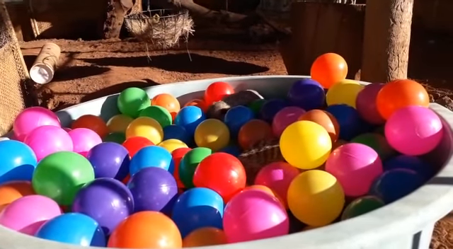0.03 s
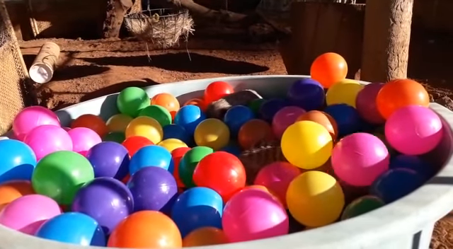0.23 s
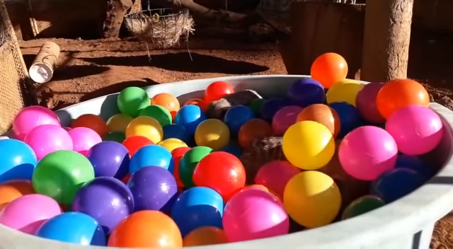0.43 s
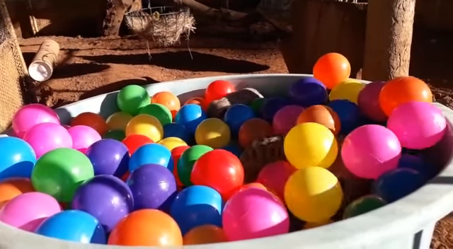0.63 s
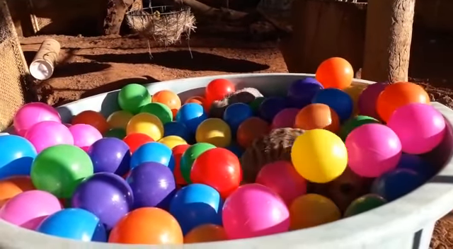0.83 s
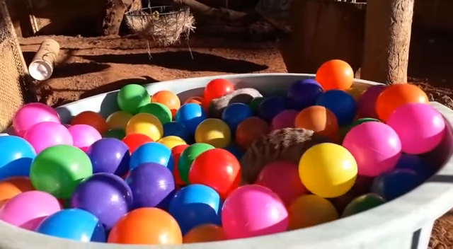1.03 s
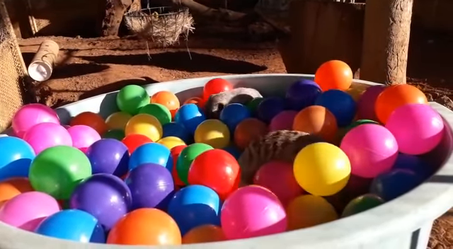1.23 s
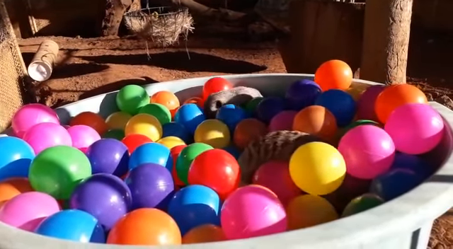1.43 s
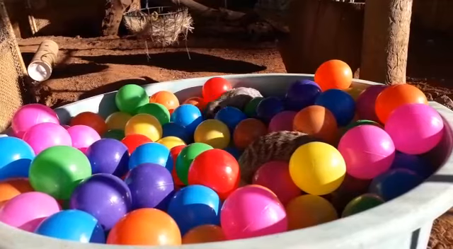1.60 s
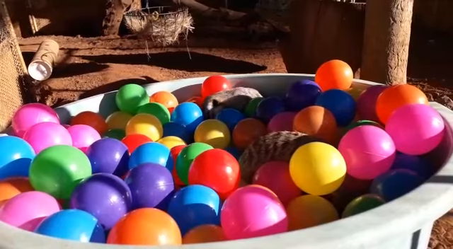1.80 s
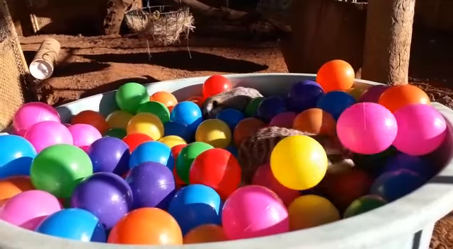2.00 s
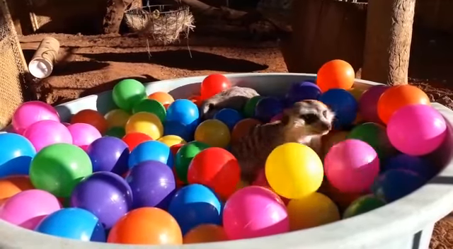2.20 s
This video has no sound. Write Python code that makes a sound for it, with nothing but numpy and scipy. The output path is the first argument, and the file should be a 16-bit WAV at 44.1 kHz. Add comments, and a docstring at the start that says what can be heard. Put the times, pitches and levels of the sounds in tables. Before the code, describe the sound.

Close by, meerkats scuff through hollow plastic balls in a tub, making a brief clatter, then a lull and a last knock. Behind them are rolling dove coos, thin bird whistles and a low outdoor rumble.

```python
"""Meerkats dig in a tub of hollow plastic balls, over a low outdoor rumble and a faint stereo hiss.
A nearby dove opens with a rolling coo while another calls farther off. Claws scuff the plastic and
the balls build to a burst of rubbing, ticking and hollow knocks, with two short coos among them.
In the lull a small bird whistles, the far dove answers and the near one rolls again. After one more
short coo the balls stir back up, squeak once and end on a last knock."""
import sys
import numpy as np
from scipy import signal
from scipy.fft import rfft, irfft
from scipy.io import wavfile

SR = 44100
rng = np.random.default_rng(int(sys.argv[2]) if len(sys.argv) > 2 else 0)


def inscribe(sig):
    """Save sig as 16-bit PCM at rate SR to the path in sys.argv[1].

    A 1-D sig is mono; a 2-D sig holds one channel per row.
    Samples are clipped to [-1, 1] before scaling.
    """
    pcm = np.round(np.clip(np.atleast_2d(sig).T, -1, 1) * 32767)
    wavfile.write(sys.argv[1], SR, pcm.astype(np.int16))


N = 103635

# EQ of the low outdoor rumble (frequency [Hz], gain [dB])
RUMBLE_EQ = [(20, -29), (40, -23.5), (65, -5), (98, 4), (130, -2), (190, -3), (300, -20), (600, -29.5),
             (3000, -32.5), (6000, -35), (7600, -32.5), (9000, -37.5), (15500, -35.5)]
# EQ of a separate faint stereo hiss (frequency [Hz], gain [dB])
HISS_EQ = [(300, -2), (1200, -18.5), (7000, -1)]

# songbird whistles, one curve each, and its closing warble (time [s], pitch [Hz], relative level [dB])
WHISTLES = [
    [(1.285, 2570, -79), (1.33, 2540, -67), (1.387, 2787, -62)],
    [(1.395, 2840, -75), (1.432, 2960, -58.5), (1.47, 2598, -56), (1.495, 2597, -55.5),
     (1.535, 2960, -65.5)],
    [(1.42, 3250, -71), (1.5, 3640, -78.5)],
    [(1.56, 2194, -73), (1.595, 2275, -69.5), (1.624, 2420, -62)],
    [(1.9, 3040, -80), (1.94, 3270, -68), (1.975, 3160, -76)],
    [(2.02, 2980, -73), (2.055, 3230, -60)],
]
WARBLE = [(2.064, 3060, -60), (2.11, 2880, -56.5), (2.18, 2790, -63)]
# far dove's rolling coos, one curve each (time [s], pitch [Hz], relative level [dB])
FAR_ROLLS = [
    [(0, 896, -53), (.08, 902, -65.5), (.16, 853, -61.5)],
    [(1.19, 949.6, -55.5), (1.26, 950, -60.5), (1.5, 882, -59.5)],
    [(1.97, 873, -58.5), (2.1, 894, -83), (2.16, 951, -55), (2.25, 912, -81)],
]

# near dove's plain coos, one curve each (time [s], pitch [Hz], level [dB])
COOS = [
    [(.706, 760, -62), (.718, 828, -45.5), (.735, 937, -53.5), (.752, 1005, -55), (.775, 870, -48.5),
     (.79, 790, -76)],
    [(1.1, 810, -60), (1.108, 839, -47.5), (1.126, 1017, -51.5), (1.16, 1003, -49.5), (1.185, 950, -60.5),
     (1.203, 752, -51.5), (1.215, 794, -50)],
    [(2.024, 744, -79), (2.034, 806, -42), (2.052, 902, -57), (2.068, 998, -52), (2.08, 808, -47),
     (2.092, 796, -90)],
]
# cues for its rolling coos (start [s], first pitch crest [s], end [s], level [dB], wall echo gain [dB])
ROLL_CUES = [(.181, .19, .632, -50, -11), (1.499, 1.531, 1.97, -51, -7.5)]
# contour of a roll (time from first crest [s], pitch [Hz], gain [dB], pulse depth [0-1])
ROLL_CONTOUR = [(-.02, 860, 0, .1), (.012, 990, -2.5, .1), (.07, 920, 0, .1), (.15, 875, 2, .15),
                (.24, 865, 1.5, .85), (.33, 855, 1, .9), (.43, 825, 3, .85), (.455, 800, -10, .6)]

# EQ of ball thuds, shell clacks and fine ticks (frequency [Hz], gain [dB])
THUD_EQ = [(40, -52.5), (110, -6.5), (200, 5.5), (400, -4.5), (620, -8.5), (900, -5.5), (1500, -24),
           (4000, -58)]
CLACK_EQ = [(250, 3), (700, -1.5), (1180, -2.5), (1520, -3.5), (1900, 4), (2550, -0.5), (3200, -13.5),
            (4200, -13.5), (9000, -55)]
TICK_EQ = [(800, -7), (3000, 8), (4200, -5), (4800, 0), (5600, 0), (7500, 4.5), (8900, -13.5),
           (12000, -8.5), (15500, -13)]
# resonances of a hollow ball (frequency [Hz], relative level [dB], t60 [s])
BALL_MODES = [(243, -7, .08), (442, -3, .05), (572, -3, .07), (668, 0, .06), (830, -7, .05),
              (1092, -5, .06), (1190, -4, .07), (1365, -7, .07), (1985, -7, .07), (2330, -7, .07),
              (2538, -6, .07)]
# fader rides for the digging, before trim (time [s], low jostle [dB], shell scrape [dB], fine rub [dB])
DIG_FADERS = [(0, -77, -82, -86), (.26, -74, -79, -88.5), (.38, -84, -68, -79.5), (.5, -62.5, -80, -80),
              (.59, -56, -64.5, -82), (.745, -59.5, -66, -69.5), (.78, -45, -49, -60.5),
              (.815, -52.5, -61.5, -67), (.86, -48, -52.5, -66.5), (.95, -54.5, -59.5, -71),
              (1.06, -55.5, -61, -69.5), (1.13, -57, -68.5, -86.5), (1.23, -59.5, -75.5, -80.5),
              (1.32, -72.5, -81, -101), (2.02, -65, -80, -95), (2.08, -60, -68.5, -79.5),
              (2.22, -67, -62.5, -68), (2.3, -65.5, -71, -75.5), (2.35, -53, -65, -74)]
# claws scuffing over plastic (time [s], length [s], level [dB], low cut [Hz])
SCUFFS = [(.052, .016, -66, 1800), (.527, .007, -59, 5500), (.539, .0055, -52, 5000),
          (.548, .01, -48, 3200), (.56, .016, -56, 2700), (.582, .016, -62, 2000), (2.052, .03, -69, 5000)]
# one ball squeaking against another, as a curve (time [s], pitch [Hz], level [dB])
SQUEAKS = [
    [(2.225, 5650, -77), (2.232, 5430, -52.5), (2.237, 5370, -81)],
]
# balls knocking together (time [s], pock pitch [Hz], pock gain [dB], clack peak [dB], tick peak [dB])
KNOCKS = [(.612, 298, -48.5, -55, -48.5), (0.7597, 1180, -44, -37.5, -68), (0.7726, 231, -35, -41.5, -57),
          (.788, 733, -45, -41.5, -71), (.835, 620, -34, -38, -41.5), (0.8576, 288, -37.5, -43, -45.5),
          (0.9022, 195, -38, -41, -40), (0.9144, 430, -28.5, -34.5, -36.5), (.9162, 725, -31.5, -41, -45),
          (0.9225, 1186, -31, -33.5, -43.5), (0.9253, 620, -33, -30.5, -40), (.968, 327, -50, -43.5, -56),
          (1.008, 283, -37, -42, -67), (1.039, 300, -40.5, -50, -58), (1.0674, 300, -49, -44.5, -50),
          (2.3275, 440, -62, -47.5, -46)]


def amp(db):
    """Decibels to gain."""
    return 10 ** (np.asarray(db) / 20)


def unit(x):
    """Scales to rms 1."""
    return x / np.sqrt(np.mean(x ** 2) + 1e-20)


def along(points, t):
    """Reads each column of a curve at times t."""
    times, *columns = np.transpose(points)
    return [np.interp(t, times, column) for column in columns]


def add(mix, start, sound):
    """Drops a sound into the mix at a start time in seconds."""
    part = mix[max(round(start * SR), 0):][:len(sound)]
    part += sound[:len(part)]


def eq(x, curve):
    """Minimum-phase EQ, so nothing rings ahead of an attack."""
    hz, db = np.transpose(curve)
    bins_hz = abs(np.fft.fftfreq(4096, 1 / SR))
    log_gain = np.log(amp(np.interp(np.log(bins_hz + 1), np.log(hz), db)))
    taps = np.fft.ifft(np.exp(signal.hilbert(log_gain).conj())).real[:2048]
    return signal.fftconvolve(x, taps)[:len(x)]


def low_cut(x, hz):
    """Thins out the lows at 12 dB per octave."""
    return signal.sosfilt(signal.butter(2, hz, "high", fs=SR, output="sos"), x)


def drift(size, rate_hz):
    """Smooth random wander of about rms 1."""
    hz = np.fft.rfftfreq(N, 1 / SR)
    spectrum = rfft(rng.standard_normal(N)) / (1 + (hz / rate_hz) ** 4)
    return unit(irfft(spectrum, N))[:size]


def reverb(x, t60, wet_db):
    """Adds a diffuse, decaying tail."""
    t = np.arange(SR // 2) / SR
    tail = rng.standard_normal(len(t)) * amp(-60 * t / t60) * np.minimum(t / .025, 1)
    return x + amp(wet_db) * signal.fftconvolve(x, tail / np.linalg.norm(tail))[:N]


def rumble_and_hiss():
    """A centred low outdoor rumble, plus a separate faint stereo hiss."""
    rumble = amp(-65) * unit(eq(rng.standard_normal(N), RUMBLE_EQ))
    hiss = amp(-80.5) * unit(eq(rng.standard_normal(N), HISS_EQ))
    return np.array([rumble + hiss, rumble - hiss])


def tone(hz, level, jitter=.013, fade_s=.004):
    """A nearly pure, slightly unsteady note."""
    t = np.arange(len(hz)) / SR
    turns = np.cumsum(hz * (1 + jitter * drift(len(t), rate_hz=100))) / SR
    fade = np.clip(np.minimum(t, t[-1] - t) / fade_s, 0, 1)
    return np.sqrt(2) * level * fade * np.sin(2 * np.pi * turns)


def throb(turns, depth):
    """Tremolo that ducks the note at the bottom of each trill cycle."""
    return 1 - np.clip(depth, 0, 1) * np.sin(np.pi * turns) ** 4


def notes(curves, trill_hz=0, swing_hz=0, pulse_depth=0):
    """Plays pitch curves as tones, plain or trilled."""
    out = np.zeros(N)
    for curve in curves:
        t = np.arange(curve[0][0], curve[-1][0], 1 / SR)
        hz, db = along(curve, t)
        turns = trill_hz * (t - t[0])
        pitch = hz + swing_hz * np.cos(2 * np.pi * turns)
        add(out, t[0], tone(pitch, amp(db) * throb(turns, pulse_depth)))
    return out


def songbird():
    """Thin gliding whistles and a closing warble, blurred by distance."""
    song = notes(WHISTLES) + notes([WARBLE], trill_hz=37, swing_hz=80, pulse_depth=.3)
    return amp(-3) * reverb(song, t60=.27, wet_db=-3)


def far_dove():
    """The answering dove's trilled coos, washed out by distance."""
    rolls = notes(FAR_ROLLS, trill_hz=37.6, swing_hz=57.4, pulse_depth=.34)
    return amp(-1.5) * reverb(rolls, t60=.3, wet_db=-3)


def rolling_coo(t, level_db):
    """A coo that slows, sinks and breaks into pulses; t is zero at its first pitch crest."""
    trill_hz, extra_turns, settle_s = 32.5, .9, .07
    swing_hz, widest_s, spread_s = 117.3, .16, .2
    hz, contour_db, pulse_depth = along(ROLL_CONTOUR, t)
    turns = trill_hz * t + extra_turns * (1 - np.exp(-t / settle_s))
    phase = 2 * np.pi * turns
    cycle = np.cos(phase + .3 * (np.cos(phase) - 1))  # leaps up, slides down
    trill = cycle + .4 * (cycle ** 2 - .5)  # narrow crests, lingering troughs
    swell = np.exp(-((t - widest_s) / spread_s) ** 2 / 2)
    onset = np.clip(.63 + t / .062, 0, 1)
    pitch = hz + swing_hz * swell * onset * trill
    flutter_db = 2.3 * drift(len(t), rate_hz=120)
    level = amp(level_db + contour_db + flutter_db) * throb(turns, pulse_depth)
    return tone(pitch, level, jitter=.017)


def near_dove(slapback_s=.0115):
    """Short plain coos, and rolling ones that slap back off a wall."""
    voice = notes(COOS)
    for start, crest, end, level_db, echo_db in ROLL_CUES:
        call = rolling_coo(np.arange(start, end, 1 / SR) - crest, level_db)
        add(voice, start, call)
        add(voice, start + slapback_s, amp(echo_db) * call)
    return reverb(voice, t60=.35, wet_db=-11)


def friction(curve, slips_per_s, spread_db, clump_db):
    """Plastic rubbing on plastic: a clumpy stream of tiny slips of uneven size, rms 1."""
    size_db = spread_db * np.minimum(rng.exponential(1, N), 4) + clump_db * drift(N, rate_hz=25)
    slips = rng.choice([-1, 1], N) * (rng.random(N) < slips_per_s / SR)
    return unit(eq(amp(size_db) * slips, curve))


def claw_scuffs():
    """Claws catch and slip in abrupt, crackling strokes."""
    out = np.zeros(N)
    grit = friction(TICK_EQ, slips_per_s=4000, spread_db=3, clump_db=.5)
    for start, length, db, low_hz in SCUFFS:
        stroke = grit[round(start * SR):round((start + length) * SR)]
        add(out, start, amp(db) * unit(low_cut(stroke, low_hz)))
    return out


def shell_ring(contacts, ring_db=-4):
    """The hollow shells ring on after each contact; the deepest lows are thinned out."""
    t = np.arange(SR // 4) / SR
    shell = sum(amp(db - 60 * t / t60) * np.cos(2 * np.pi * hz * t) for hz, db, t60 in BALL_MODES)
    ringing = np.std(contacts) * unit(signal.fftconvolve(contacts, shell)[:N])
    return low_cut(contacts + amp(ring_db) * ringing, hz=82)


def impact(curve, decay_s):
    """One hit with a brief chatter, peak 1."""
    t = np.arange(SR // 10) / SR
    force = rng.standard_normal(len(t)) * np.exp(-t / decay_s)
    hit = eq(force, curve)
    return hit / abs(hit).max()


def pock(hz, attack_s=.0007, decay_s=.006):
    """The short hollow note of a dented ball."""
    t = np.arange(SR // 10) / SR
    return (1 - np.exp(-t / attack_s)) * np.exp(-t / decay_s) * np.cos(2 * np.pi * hz * t)


def clack(t60=.02):
    """A hit rings one ball's upper modes, peak 1; every ball is tuned a little differently."""
    t = np.arange(SR // 10) / SR
    tuning = 1 + rng.uniform(-.125, .1)
    shell = sum(amp(db - 60 * t / t60) * np.cos(2 * np.pi * hz * tuning * t)
                for hz, db, _ in BALL_MODES if hz > 1000)
    hit = signal.fftconvolve(impact(CLACK_EQ, decay_s=.0046), shell)[:len(t)]
    return hit / abs(hit).max()


def ball_tub():
    """Digging rings the shells under knocks, bright rubs and ticks; a faint stereo width sits in the treble."""
    jostle_db, scrape_db, rub_db = along(DIG_FADERS, np.arange(N) / SR)
    jostle = amp(jostle_db - 2) * friction(THUD_EQ, slips_per_s=700, spread_db=2, clump_db=3.5)
    scrape = amp(scrape_db - .5) * friction(CLACK_EQ, slips_per_s=900, spread_db=3, clump_db=2)
    rub = amp(rub_db + 5.5) * friction(TICK_EQ, slips_per_s=2500, spread_db=3.4, clump_db=3.5)
    body = shell_ring(jostle + scrape)
    bright = rub + claw_scuffs()
    for start, hz, pock_db, clack_db, tick_db in KNOCKS:
        add(body, start, amp(pock_db) * pock(hz) + amp(clack_db) * clack())
        add(bright, start, amp(tick_db) * impact(TICK_EQ, decay_s=.003))
    smear = reverb(bright, t60=.09, wet_db=-15) - bright  # wet only
    side = amp(-31) * np.diff(smear, prepend=0)  # faint stereo width in the treble
    mid = reverb(body, t60=.22, wet_db=-15.5) + reverb(bright, t60=.15, wet_db=-10) + notes(SQUEAKS)
    return np.array([mid + side, mid - side])


def scene():
    """The tub up front, birds and rumble behind it, all near the centre over a faint stereo hiss."""
    return ball_tub() + near_dove() + far_dove() + songbird() + rumble_and_hiss()


def record(dry, cutoff_hz=15780):
    """A steep high cut on the master."""
    taps = signal.firwin(511, cutoff_hz, window=("kaiser", 9), fs=SR)
    return signal.oaconvolve(dry, taps[None], "same")


dry = scene()
out = record(dry)
inscribe(out)
```